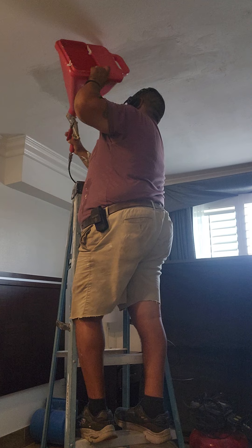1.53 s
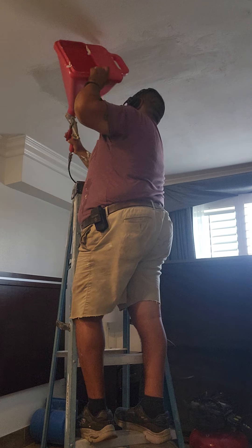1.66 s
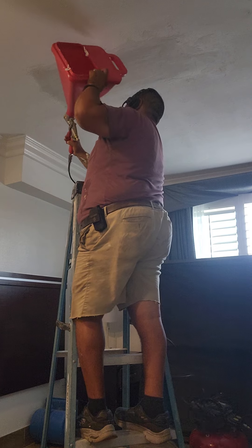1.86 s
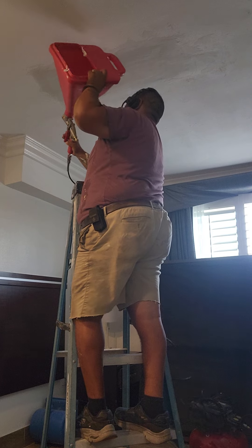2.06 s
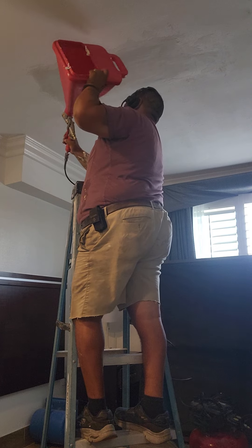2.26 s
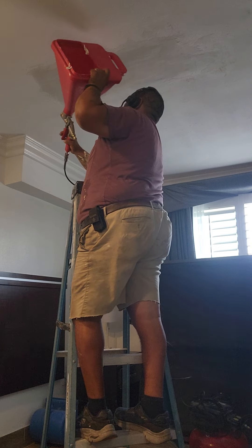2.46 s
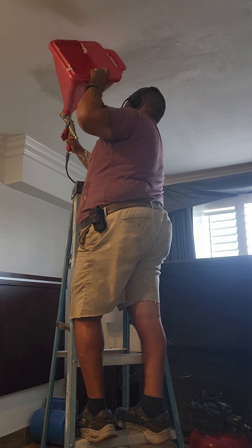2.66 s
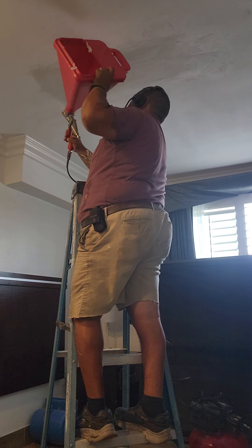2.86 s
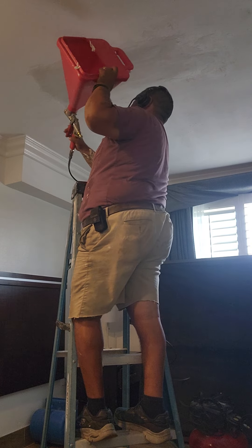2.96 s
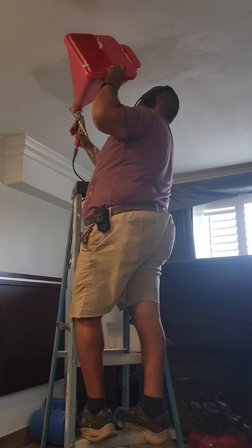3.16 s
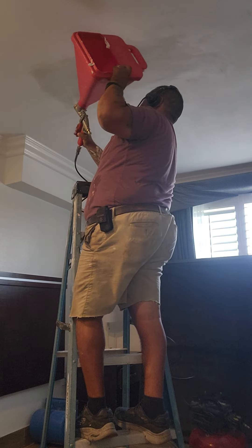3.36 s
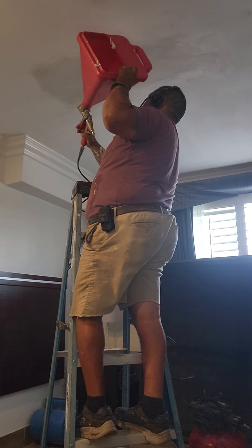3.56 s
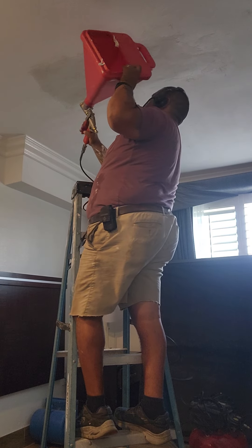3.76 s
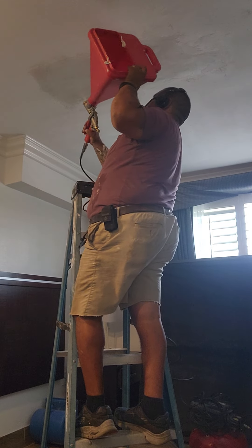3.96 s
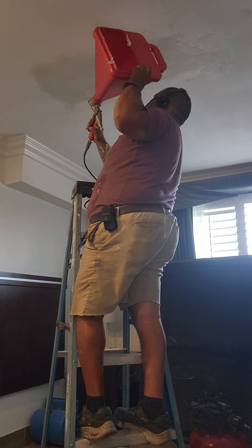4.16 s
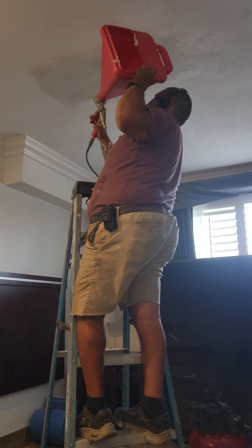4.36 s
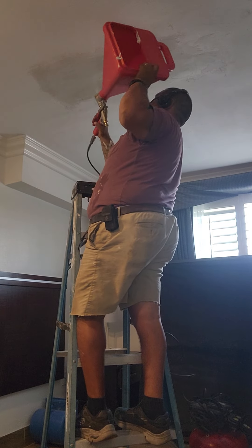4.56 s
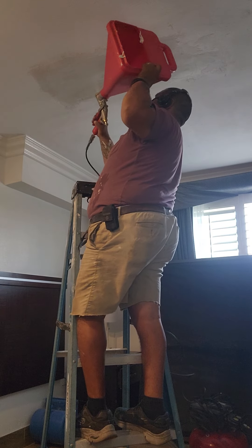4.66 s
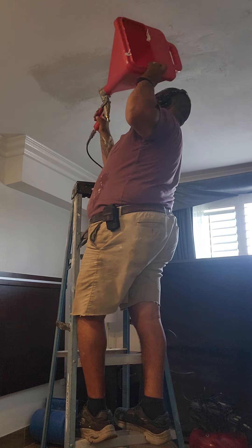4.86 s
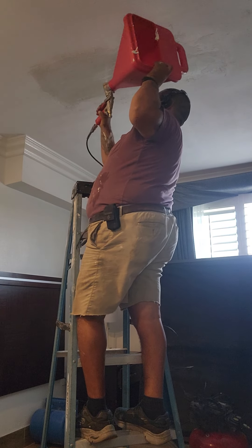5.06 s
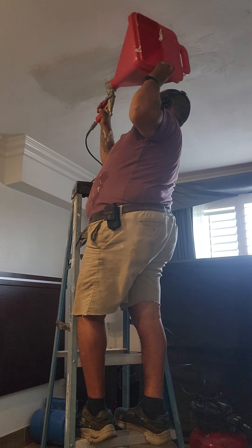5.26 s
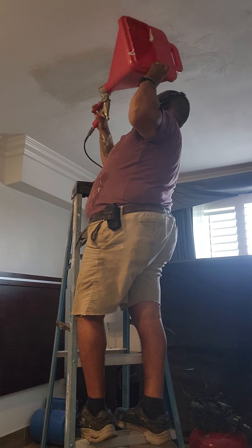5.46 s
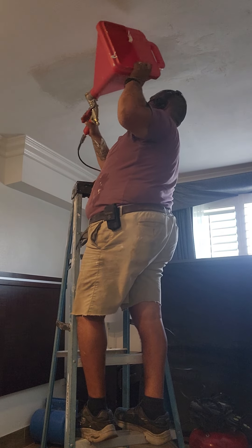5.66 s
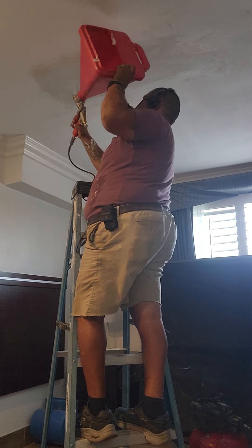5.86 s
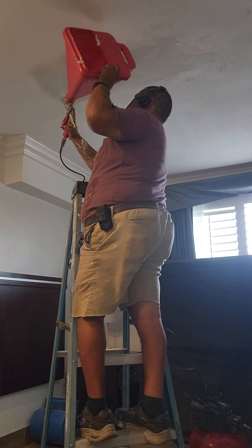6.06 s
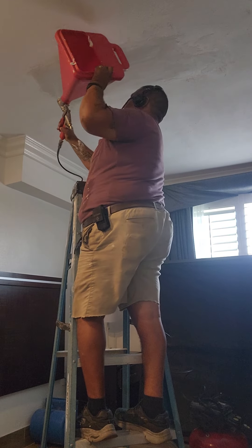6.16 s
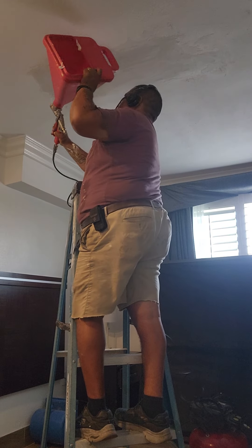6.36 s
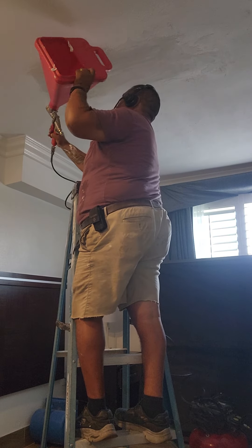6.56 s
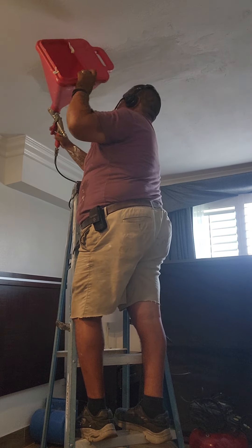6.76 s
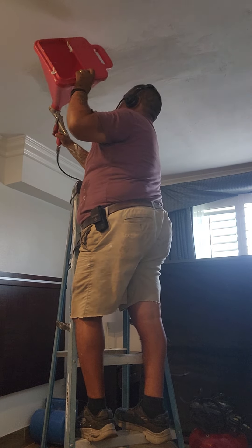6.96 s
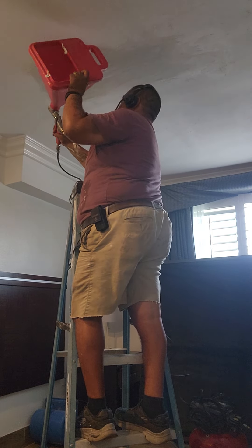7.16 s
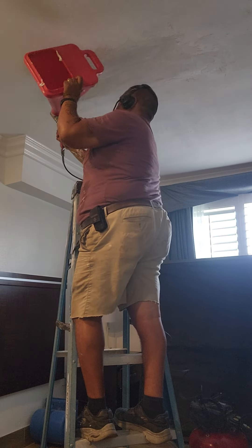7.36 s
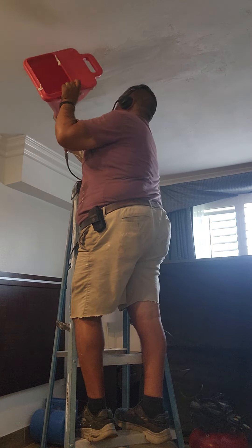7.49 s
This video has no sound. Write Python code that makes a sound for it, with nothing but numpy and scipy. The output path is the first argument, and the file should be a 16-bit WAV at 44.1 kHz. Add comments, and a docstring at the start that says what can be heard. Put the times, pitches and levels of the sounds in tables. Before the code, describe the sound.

A piston compressor putters quickly and steadily at some distance, with a faint air leak. Over it, an air gun puffs briefly and then sprays wet mud at a ceiling, first in separate bursts, then in passes of about a second. Bright hiss and grainy, mid-heavy roar fill the hard room, with short gaps of fading reverberation and a few hollow tones. Soft, very low thuds occur later; the microphone is nearby and stereo.

```python
"""A hopper gun sprays wet texture onto a ceiling, first in short bursts, then in long passes.
Filtered noise makes its dry air jet and hiss; delayed mud adds a spluttering roar of noise and tiny impacts.
Gliding echoes and changing diffuse tails give the bare room's answer as the gun is swept about.
Some way off a piston compressor chugs as pulses ringing a tank, over throbbing noise and a motor hum.
A faint noise leak and soft low thuds, swelling sines, fill the background."""
import sys
import numpy as np
from scipy import signal
from scipy.fft import rfft, irfft, next_fast_len
from scipy.io import wavfile
from scipy.ndimage import uniform_filter1d, map_coordinates

SR = 44100
rng = np.random.default_rng(int(sys.argv[2]) if len(sys.argv) > 2 else 0)


def transcribe(u):
    """Save the signal u as a 16-bit wav file named by the first command-line argument.

    u: samples, shape (n,) or (channels, n), limited to [-1, 1]; the rate is SR.
    q: integer samples, one column per channel.
    """
    v = np.clip(np.atleast_2d(u).T, -1, 1)
    q = np.round(v * 32767).astype(np.int16)
    wavfile.write(sys.argv[1], SR, q)


N = 362943


def amp(db):
    """Decibel law: level to amplitude gain."""
    return 10 ** (np.asarray(db) / 20)


def unit(x):
    """Normalisation: scale to rms 1."""
    return x / np.sqrt(np.mean(x ** 2) + 1e-20)


def along(points, hz):
    """Logarithmic frequency scale: (frequency [Hz], value) points interpolated on it."""
    f, value = np.transpose(points)
    return np.interp(np.log(hz + 1), np.log(f + 1), value)


def clock():
    """Sampling: the time of every sample [s]."""
    return np.arange(N) / SR


def wobble(rate):
    """Band-limited fluctuation: a smooth random curve through rate knots a second."""
    return map_coordinates(rng.standard_normal(4096), [clock() * rate], mode="wrap")


def filtered(x, response):
    """Linear filtering: the spectrum of x times a response of frequency."""
    m = next_fast_len(N + SR // 2)
    return irfft(rfft(x, m) * response(np.fft.rfftfreq(m, 1 / SR)), m)[..., :N]


def coloured(x, spectrum):
    """Spectral shaping: x filtered by a table of levels, at rms 1."""
    return unit(filtered(x, lambda hz: amp(along(spectrum, hz))))


# relative spectra of the air jet, the nozzle hiss and the mud roar: (frequency [Hz], level [dB])
JET_SPECTRUM = [(500, -65), (2000, -14), (4000, -11), (6500, -4.5), (7700, -0.5), (8500, -13), (9500, -15),
                (10300, -5), (11400, 1), (13000, 1), (15800, -3)]
HISS_SPECTRUM = [(1000, -29.5), (2700, -17.5), (3200, -6.5), (3600, -14), (4100, -3.5), (4500, -6),
                 (4900, -1), (5500, 1), (6500, -1.5), (7400, -7.5), (8300, -20.5), (9500, -30),
                 (15000, -13)]
ROAR_SPECTRUM = [(40, -36), (70, -21), (100, -8), (170, -4), (210, -5.5), (272, 1.5), (330, -2),
                 (385, -1.5), (470, -3.5), (780, 1), (1050, -1.5), (1300, -3.5), (1750, -4), (2170, 2.5),
                 (2600, -3.5), (3200, -0.5), (4150, 0.5), (4700, -17), (9000, -41)]
BASS_HZ = 232  # the roar's bass lies below this


def gun(jet_db, hiss_db, roar_db, splutter_db, spatter):
    """Jet noise and atomisation: air shreds uneven slugs of mud, whose droplets roar on a wide patch of ceiling."""
    jet_gain, hiss_gain, mud_gain, bass_gain = trigger(closing=0.012)
    slugs = amp(splutter_db * unit(wobble(70) + wobble(260)))
    jet = jet_gain * coloured(rng.standard_normal(N), JET_SPECTRUM)

    turbulence = np.sqrt(slugs) * rng.standard_normal(N)
    tearing = spatter * droplets(rate=900, spread_db=6)
    hiss = hiss_gain * coloured(turbulence + tearing, HISS_SPECTRUM)

    pelting = np.array([droplets(rate=2500, spread_db=3.5) for side in range(2)])
    impacts = slugs * (0.51 * rng.standard_normal((2, N)) + pelting)
    stream = patchy(coloured(impacts, ROAR_SPECTRUM), depth_db=1.47)
    bass = filtered(stream, lambda hz: 1 / (1 + (hz / BASS_HZ) ** 4))
    roar = mud_gain * (stream - bass) + bass_gain * bass
    return amp(jet_db) * jet + amp(hiss_db) * hiss, amp(roar_db) * roar


# trigger pulls, levels relative: (open [s], close [s], valve travel [s], opening surge [dB], air jet [dB],
# nozzle hiss [dB], wait for the mud [s], mud flow [dB])
TRIGGER_PULLS = [(-.12, 0.033, .005, 9, -24, -24, 0.12, -23),
                 (0.372, 0.528, 0.0089, 5, -24, -24, 0.14, -18),
                 (1.237, 1.442, 0.0085, 0.5, -21.5, -21, 0.14, -7.5),
                 (1.797, 2.025, 0.0073, 8.5, -24.5, -25.5, 0.13, -18),
                 (2.249, 2.441, 0.0079, 5, -22, -22.5, .068, 1.5),
                 (2.759, 3.048, 0.0049, 4.5, -21.5, -22.5, .11, 0.5),
                 (3.29, 3.602, 0.0055, 6, -22.5, -22.5, 0.061, -1),
                 (3.846, 4.398, 0.0045, 3.5, -23.5, -22.5, 0.065, -0.5),
                 (4.589, 5.46, 0.0065, 4.5, -22.5, -23, 0.063, -0.5),
                 (5.741, 6.747, 0.0025, 4, -23, -22.5, 0.11, -0.5),
                 (6.983, 8.257, 0.0025, 5, -22.5, -23, 0.069, 0)]
SURGE_S, SURGE_IN_HISS = 0.071, 0.79  # hose pressure escapes first [s]; share of that surge in the hiss
SAG_DB, SAG_S = -1.5, .4  # the jet's pressure sags while the trigger is held
MUD_RISE_S = .01  # the nozzle fills with mud
MUD_ON_JET_DB, ATOMISE_DB = 0.2, 5.5  # change of jet and of hiss at a mud gain of 1
SPIT_DB, SPIT_S = -14.5, 0.037  # the surge blows out mud left in the nozzle
FLUTTER_DB, FLUTTER_RATE = 2, 14  # the air gap narrows and widens as mud passes (knots a second)
FLUTTER_IN_HISS = 0.49  # share of that flutter in the hiss
THICKEN_S, THICK_DB = 0.1, 1.5  # the stream thickens, so the bass of the roar builds last


def trigger(closing):
    """Valve transients: gains of jet, hiss, roar and its bass, a surge of dry air, then mud, then a soft closing."""
    t, gains = clock(), np.zeros((4, N))
    flutter = FLUTTER_DB * wobble(FLUTTER_RATE)
    for start, stop, travel, surge_db, jet_db, hiss_db, wait, mud_db in TRIGGER_PULLS:
        age = np.maximum(t - start, 0)
        opening = (1 + np.tanh((t - start) / travel)) / 2
        valve = opening * np.exp(-np.clip((t - stop) / closing, 0, 20))
        surge = surge_db * np.exp(-(age / SURGE_S) ** 2)
        sag = SAG_DB * (1 - np.exp(-age / SAG_S))
        mud = amp(mud_db) * (1 + np.tanh((age - wait) / MUD_RISE_S)) / 2
        spit = amp(SPIT_DB + surge_db) * np.exp(-age / SPIT_S)
        jet = amp(jet_db + surge + sag + mud * (MUD_ON_JET_DB + flutter))
        mud_in_hiss = np.sqrt(mud) * (ATOMISE_DB + FLUTTER_IN_HISS * flutter)
        hiss = amp(hiss_db + SURGE_IN_HISS * surge + mud_in_hiss)
        thick = amp(THICK_DB) * mud * (1 - np.exp(-np.maximum(age - wait, 0) / THICKEN_S))
        gains += valve * np.array([jet, hiss, mud + spit, thick])
    return gains


def droplets(rate, spread_db):
    """Random impact noise: tiny impacts of very unequal size, rate a second on average."""
    hit = rng.random(N) < rate / SR
    sign = rng.choice([-1, 1], N)
    return unit(hit * sign * amp(spread_db * rng.standard_normal(N)))


def patchy(x, depth_db):
    """Narrow-band modulation: the spray cone flaps, so narrow bands swell and sink briefly."""
    bands = signal.stft(x, nperseg=512)[2]
    field = uniform_filter1d(rng.standard_normal(bands.shape[1:]), size=3, axis=0)  # over frequency
    field = uniform_filter1d(field, size=22, axis=1)  # over time
    return unit(signal.istft(bands * amp(depth_db * unit(field)), nperseg=512)[1][:, :N])


# hollow tones of the gun, levels relative: (start [s], end [s], pitch [Hz], level [dB])
HOLLOW_TONES = [(2.299, 2.434, 813, -34.5), (2.869, 3.056, 926, -35), (3.892, 4.188, 737, -28),
                (4.12, 4.401, 780, -29), (4.717, 5.011, 743, -35), (5.85, 6.153, 822, -31)]
# partials of each hollow tone: (multiple of the pitch [ratio], relative level [dB])
HOLLOW_PARTIALS = [(1, -0.5), (1.92, -5), (2.95, -7.5)]
HOLLOW_GLIDE = .012  # pitch runs from this share below to this share above


def hollow(width_hz):
    """Cavity resonance: turbulence rings a cavity in the gun, whose pitch glides up as the mud shifts."""
    t, out = clock(), np.zeros(N)
    for start, stop, hz, db in HOLLOW_TONES:
        on = (t > start) & (t < stop)
        count = on.sum()
        pitch = hz * (1 + HOLLOW_GLIDE * np.linspace(-1, 1, count))
        phase = 2 * np.pi * np.cumsum(pitch) / SR
        fade = signal.windows.tukey(count, .4)
        knot_times = [(t[on] - start) * width_hz]
        for multiple, partial_db in HOLLOW_PARTIALS:
            # random cosine and sine parts widen the partial into a narrow band
            a, b = (map_coordinates(knots, knot_times, mode="wrap") for knots in rng.standard_normal((2, 128)))
            partial = a * np.cos(multiple * phase) + b * np.sin(multiple * phase)
            out[on] += amp(db + partial_db) * fade * partial
    return out


def near_walls(x, echo, sweep_ms, count):
    """Comb filtering: echoes off ceiling, hopper and walls glide as the gun is swept, so the hiss phases."""
    t, pair = clock(), np.zeros((2, N))
    hand = wobble(1.6) * np.interp(t, [2, 4], [.4, 1])  # the strokes widen for the long passes
    dull = filtered(x, lambda hz: 1 / (1 + (hz / 9000) ** 4))  # rough surfaces scatter the top treble
    for path, direct_ms in zip(pair, (0, .35)):
        path += np.pad(x, (round(direct_ms * SR / 1000), 0))[:N]
        for delay_ms, slant, size in rng.uniform([.8, -1, -1], [9, 1, 1], (count, 3)):
            delay = (delay_ms + sweep_ms * slant * hand) / 1000
            path += echo * size * np.interp(t - delay, t, dull, left=0)
    return unit(pair) * np.std(x)


# reverberation time of the room: (frequency [Hz], time to fall 60 dB [s])
ROOM_DECAY = [(300, 0.49), (800, 0.42), (2100, 0.42), (5500, 0.41), (14600, 0.3)]


def reverberate(x):
    """Diffuse reverberation: two noise tails of about unit energy; each frequency dies at its own speed."""
    hz, t, z = signal.stft(rng.standard_normal((2, SR // 2)), SR, nperseg=256)
    t60 = along(ROOM_DECAY, hz)[:, None]
    decaying = z * amp(-60 * t / t60) / np.sqrt(t60)
    tail = signal.istft(decaying, SR, nperseg=256)[1]
    return signal.fftconvolve(x[None], tail / np.linalg.norm(tail[0]), axes=1)[:, :N]


def moving_room(x, count):
    """Source-dependent room response: as the gun moves, count tails take over from one another."""
    place = np.linspace(0, count - 1, N)
    shares = (np.sqrt(np.clip(1 - abs(place - k), 0, 1)) for k in range(count))
    return sum(reverberate(x * share) for share in shares)


# likeness of the left and right sound: (frequency [Hz], correlation [-1 to 1])
LIKENESS = [(60, 1), (280, .97), (450, 0.99), (740, 0.68), (1220, -0.37), (2000, -0.058), (5000, 0.033)]


def ports(pair):
    """Spatial coherence: two unrelated sound paths reach two close microphone ports, which share the bass."""
    turn = lambda hz: np.arccos(np.clip(along(LIKENESS, hz), -1, 1)) / 2
    mid, side = filtered(pair, lambda hz: np.array([np.cos(turn(hz)), np.sin(turn(hz))]))
    return np.array([mid + side, mid - side])


# balance of the gun's sound: (frequency [Hz], left minus right [dB])
BALANCE = [(60, -1), (260, -2), (550, -6), (790, -7), (1650, -3), (3440, -4), (4500, -0.5), (5000, -6),
           (6400, -4), (7300, 6), (8600, 9.5), (9600, 8), (10500, 7.5), (12200, 1), (15000, 1)]


def spraying(room_db):
    """Direct and reverberant field: the gun in the room, coloured differently at each side of the microphone."""
    nozzle, roar = gun(jet_db=4.0, hiss_db=0.5, roar_db=-24.0, splutter_db=2.0, spatter=0.35)
    roar = roar + amp(-3.0) * np.array([hollow(width_hz=140) for side in range(2)])
    direct = near_walls(nozzle, echo=0.8, sweep_ms=0.522, count=6) + roar
    diffuse = moving_room(nozzle + roar[0], count=22)
    pair = amp(-1.5) * direct + amp(room_db) * diffuse
    return filtered(ports(pair), lambda hz: amp(np.outer([.5, -.5], along(BALANCE, hz))))


# relative spectrum of the valve puffs: (frequency [Hz], level [dB])
PUFF_SPECTRUM = [(30, -26), (60, -10), (170, -6), (240, -7), (300, -7), (345, -10.5), (570, -13),
                 (650, -10.5), (830, -10.5), (900, -18), (1090, -7), (1250, -18.5), (1780, -18),
                 (3500, -39)]
# tank resonances: (frequency [Hz], width [Hz], relative level [dB])
TANK_MODES = [(201.5, 6.6, -7), (238.4, 8.6, 2), (290.5, 10, -8)]


def tank(hz):
    """Modal superposition: resonances of alternating sign add up."""
    response = 0
    for k, (centre, width, db) in enumerate(TANK_MODES):
        loss = 1j * hz * width
        response = response + (-1) ** k * amp(db) * loss / (centre * centre - hz * hz + loss)
    return response


def compressor(stroke_hz, knock_db, clatter_db, throb_db):
    """Forced resonance: piston strokes ring the tank, blurred by the room, and puff through the valves."""
    turns = stroke_hz * clock() + 0.011 * wobble(5)  # the crank runs slightly unevenly
    intake = np.gradient(np.floor(turns))
    discharge = .5 * np.gradient(np.floor(turns + .42))
    strokes = (intake + discharge) * amp(3.5 * wobble(14))
    knocks = unit(filtered(reverberate(strokes), tank))
    throb = np.cos(2 * np.pi * turns) + wobble(70)
    puffs = amp(throb_db * throb) * rng.standard_normal((2, N))
    return ports(amp(knock_db) * knocks + amp(clatter_db) * coloured(puffs, PUFF_SPECTRUM))


# hum tones, before the fade: (frequency [Hz], level [dB])
HUM_TONES = [(70.6, -49.5), (119.3, -57.5), (649, -55)]
# fade of the whole hum: (time [s], level [dB])
HUM_LEVELS = [(1.3, 0), (3, -8.5)]


def motor():
    """Tonal radiation: the compressor's motor hums in sines whose level and phase waver."""
    t, hum = clock(), np.zeros(N)
    for hz, db in HUM_TONES:
        level = amp(db + wobble(3.3))
        hum += level * np.sqrt(2) * np.sin(2 * np.pi * hz * t + wobble(1.83) / 2)
    return amp(np.interp(t, *np.transpose(HUM_LEVELS))) * hum


# relative spectrum of the escaping air: (frequency [Hz], level [dB])
LEAK_SPECTRUM = [(1470, -3.5), (2500, -3.5), (2600, -7), (2820, -6.5), (3070, -5), (4500, -4.5), (5320, -2),
                 (9580, -17.5), (11300, -6.5), (15500, -16)]


def leak(level_db):
    """Turbulent flow noise: a little air escapes throughout, even with the trigger shut."""
    return amp(level_db + 0.25 * wobble(3.6)) * coloured(rng.standard_normal((2, N)), LEAK_SPECTRUM)


# soft low thuds: (time [s], level [dB])
THUDS = [(4.58, -51), (5.05, -39), (5.2, -50), (5.501, -45), (5.9, -45), (6.37, -49), (8.0, -40)]


def thuds(pitch_hz, length):
    """Amplitude-modulated tone: a very low sine swells briefly at each thud."""
    t = clock()
    swell = sum(amp(db) * np.exp(-((t - s) / length) ** 2) for s, db in THUDS)
    return swell * np.sqrt(2) * np.sin(2 * np.pi * pitch_hz * t + wobble(18))


def scene():
    """Superposition: gun, compressor and small noises add together."""
    machine = compressor(stroke_hz=12.35, knock_db=-43.0, clatter_db=-41, throb_db=0.26) + motor()
    return spraying(room_db=-2.0) + machine + leak(level_db=-42.0) + thuds(pitch_hz=35, length=0.048)


TOP_HZ = 15800  # band limit


def record(dry):
    """Band limiting: the recorder keeps nothing above its limit."""
    return filtered(dry, lambda hz: hz < TOP_HZ)


dry = scene()
out = record(dry)
transcribe(out)
```